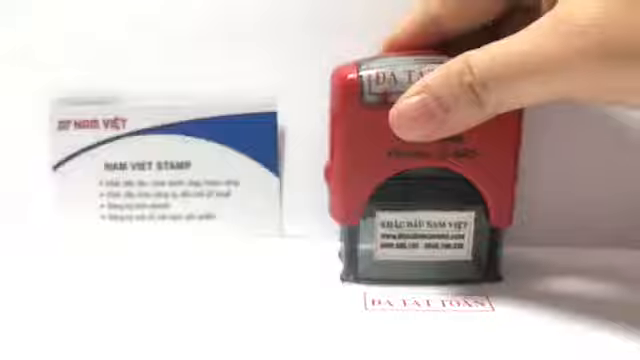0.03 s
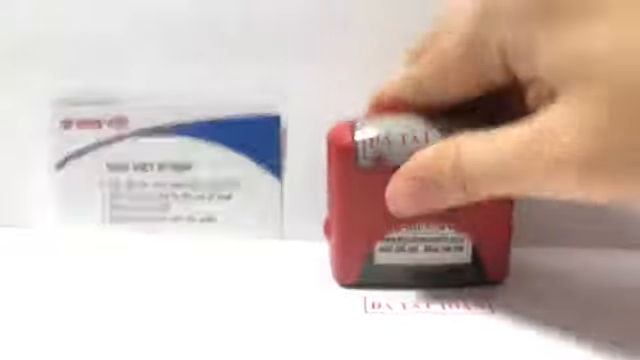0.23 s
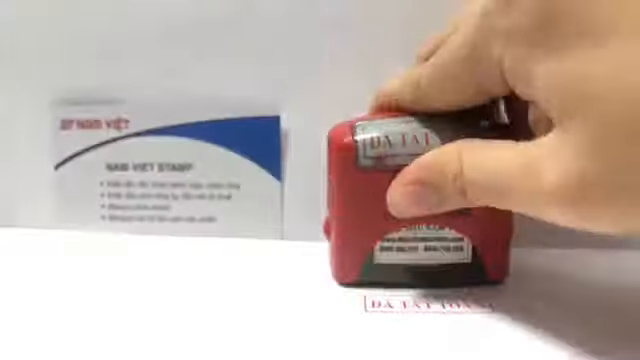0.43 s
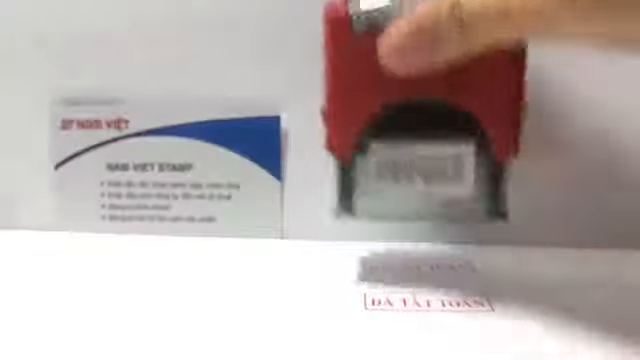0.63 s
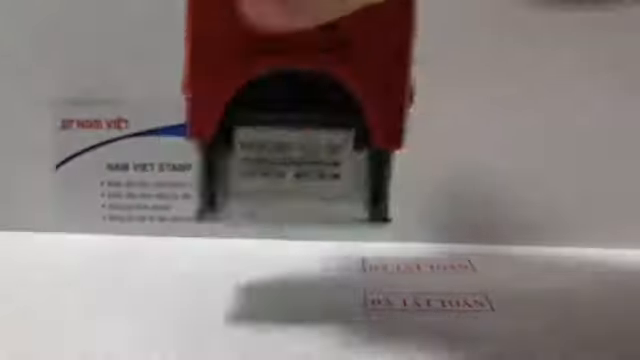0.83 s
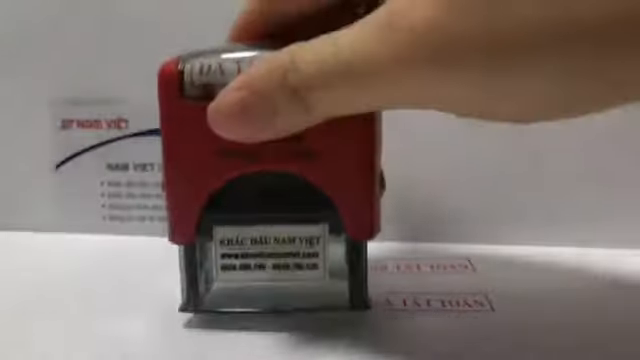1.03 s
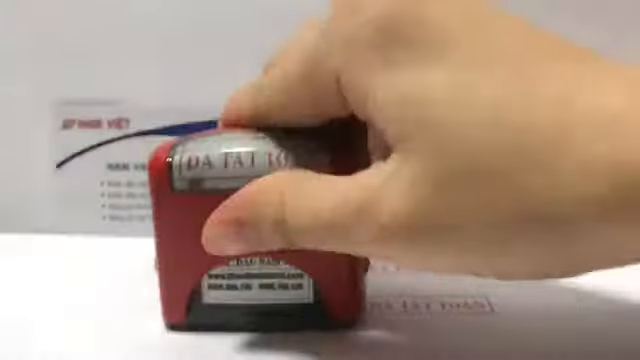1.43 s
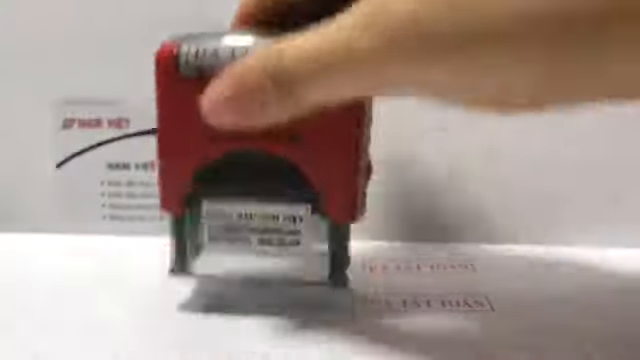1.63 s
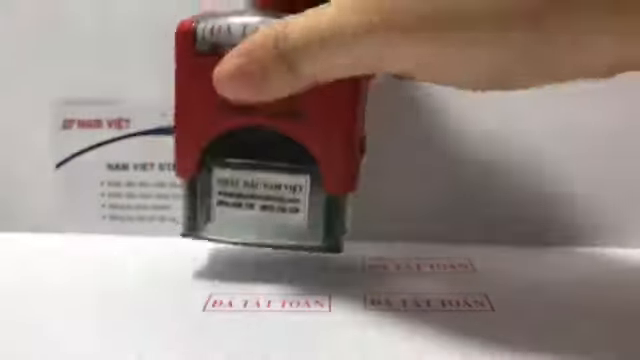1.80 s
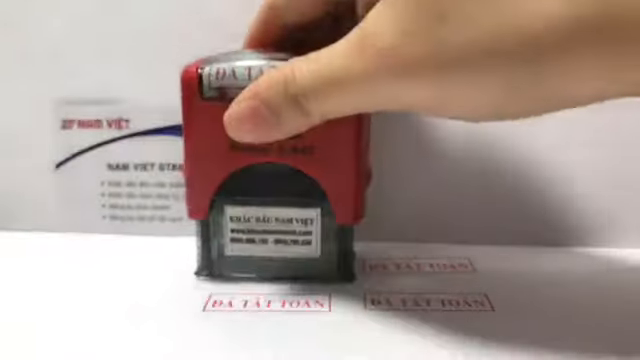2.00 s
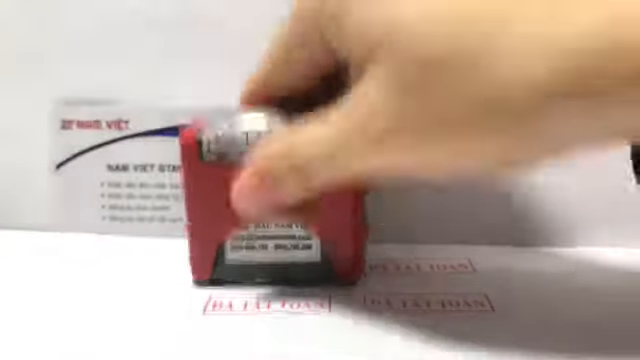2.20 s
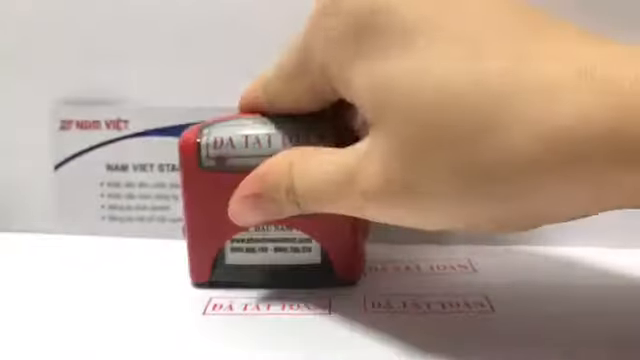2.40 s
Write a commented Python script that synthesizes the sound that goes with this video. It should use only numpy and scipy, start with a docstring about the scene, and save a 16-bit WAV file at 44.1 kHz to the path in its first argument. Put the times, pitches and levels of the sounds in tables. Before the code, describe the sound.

A plastic self-inking stamp is pressed onto paper three times, each a sharp clack with a low desk thump. It springs back with a click after the first two presses. Heard close in a small, quiet room.

```python
"""Self-inking stamp on a desk

A plastic stamp is pressed onto paper three times and springs back twice, close by. In each stroke
the case ticks and rubs along its frame, the die plate flips over and the slide clacks against its stop.
Presses thump the desk and leave the spring ringing. A small room answers; a limiter flattens the clacks."""
import sys
import numpy as np
from scipy import signal
from scipy.fft import rfft, irfft
from scipy.io import wavfile
from scipy.ndimage import uniform_filter1d, minimum_filter1d

SR = 44100
rng = np.random.default_rng(int(sys.argv[2]) if len(sys.argv) > 2 else 0)


def persist_wave(psi):
    """Save psi, clipped to +-1, as 16-bit WAV."""
    counts = np.round(np.clip(psi, -1, 1) * 32767).astype(np.int16)
    wavfile.write(sys.argv[1], SR, np.atleast_2d(counts).T)


N = 112454
T = np.arange(N) / SR


def amp(db):
    """Decibels to gain."""
    return 10 ** (np.asarray(db) / 20)


def add(out, start_s, x):
    """Mix x in from start_s."""
    i = int(start_s * SR)
    out[i:i + len(x)] += x[:N - i]


def noise(spectrum, size):
    """Noise of rms 1, shaped by (Hz, dB) points."""
    hz, db = np.array(spectrum).T
    bin_hz = np.maximum(np.fft.rfftfreq(size, 1 / SR), 1)
    gain = amp(np.interp(np.log(bin_hz), np.log(hz), db)) * np.minimum(bin_hz / hz[0], 1) ** 2
    x = irfft(gain * np.exp(2j * np.pi * rng.random(len(bin_hz))), size)
    return x / x.std()


def ring(modes, tuning, rise_cycles, tilt_db_oct=0):
    """Damped modes, tilted about 1 kHz. Each builds over its first cycles, so low ones speak late."""
    t = T[:N // 6]
    out = np.zeros(len(t))
    for k, (hz, db, t60_s) in enumerate(modes):
        decay = amp(db + tilt_db_oct * np.log2(hz / 1000) - 60 * t / t60_s)
        rise = 1 - np.exp(-(hz * t / rise_cycles) ** 2)
        out += (-1) ** k * decay * rise * np.sin(2 * np.pi * hz * tuning * t)
    return out


# Each row: frequency in Hz, rms level in dB.
HUM_TONES = [(100.5, -66.5), (149.5, -68)]
# Each row: frequency in Hz, relative density in dB.
AIR_SPECTRUM = [(40, -10.5), (60, -10.5), (115, -5), (200, -9), (320, -15.5), (600, -24), (1100, -26.5),
                (2200, -36), (4000, -38), (8000, -44.5), (16000, -47)]

def background():
    """Still room air and a faint mains hum."""
    hum = sum(amp(db) * np.sqrt(2) * np.sin(2 * np.pi * (hz * T + rng.random())) for hz, db in HUM_TONES)
    return amp(-61.5) * noise(AIR_SPECTRUM, N) + hum


# Each row: frequency in Hz, tail level in dB, T60 in seconds.
ROOM_BANDS = [(60, -13.5, 1), (160, -7.5, 0.39), (258, -1.5, 0.62), (500, -10, 0.39), (1000, -17.5, 0.45),
              (2520, -16, 0.43), (5000, -15.5, 0.38), (7600, -25, 0.6), (16000, -14, .28)]

def room(x, lag_s=0.008, rise_s=0.004, early_db=-11.5, early_fall_s=0.0078):
    """Early echoes off desk and wall, then a diffuse tail that lasts longest in the bass."""
    hz, db, t60_s = np.array(ROOM_BANDS).T
    t = T[:N // 3]
    log_hz = np.log(np.maximum(np.fft.rfftfreq(len(t), 1 / SR), 1))
    white = rfft(rng.standard_normal(len(t)))
    early = rng.standard_normal(len(t)) * np.exp(-t / early_fall_s)
    response = amp(early_db) * early * np.sqrt(2 / (early_fall_s * SR))
    for share, gain, rate in zip(np.eye(len(hz)), amp(db), np.log(1000) / t60_s):
        band = irfft(white * np.interp(log_hz, np.log(hz), share), len(t))
        response += gain * band * np.exp(-rate * t) * np.sqrt(2 * rate / SR)
    onset = np.clip((t - lag_s) / rise_s, 0, 1)
    return signal.fftconvolve(x, response * onset)[:N]


# Each row: frequency in Hz, relative density in dB.
SKID_SPECTRUM = [(400, 6), (1000, 0), (3000, 0.5), (6000, -12), (15000, -26.5)]

def skid():
    """The frame skids softly over the paper before the last press."""
    swell = np.interp(T, [1.993, 2.2, 2.23], [0, 1, 0])
    return amp(-63) * swell * noise(SKID_SPECTRUM, N)


# Each row: frequency before tuning in Hz, level in dB, T60 in seconds.
DESK_MODES = [(61.7, -5.5, .2), (98, -6.5, 0.24), (135, -1, 0.073), (168, -3, 0.16), (220.4, -13, 0.3),
              (274.6, -8, .15), (343, -8.5, 0.074), (505, 7, 0.016)]

def desk_thump(db, tuning):
    """The struck desk top rings low."""
    return amp(db) * ring(DESK_MODES, tuning, rise_cycles=0.78)


# Dense upper modes of the plastic. Each row: frequency in Hz, relative density in dB.
CHATTER_SPECTRUM = [(200, -15), (500, -9), (1000, 1), (1650, 1), (2050, -3.5), (2700, 2.5), (3900, -2),
                    (5200, -0.5), (8200, -3.5), (9600, -6), (10900, -14.5), (12500, -4), (15500, -14)]
# First instant of contact. Each row: frequency in Hz, relative density in dB.
SNAP_SPECTRUM = [(1000, -12), (3000, 4), (8000, 2), (11000, -8.5), (13000, -2.5), (15500, -2.5)]

def knock(modes, ring_db, crack_db, chatter_s, tuning, tilt_db_oct=0, rise_cycles=0.67):
    """Struck plastic: the case rings under a crack made of a bright snap and brief chatter."""
    rise_s, fall_s, snap_s, snap_db = 0.00024, 0.0018, 0.0007, -3.5
    out = amp(ring_db) * ring(modes, tuning, rise_cycles, tilt_db_oct)
    t = T[:1024]
    envelope = (1 - np.exp(-t / rise_s)) * np.exp(-np.maximum(t - chatter_s, 0) / fall_s)
    chatter = envelope * noise(CHATTER_SPECTRUM, len(t))
    snap = amp(snap_db) * t / snap_s * np.exp(1 - t / snap_s) * noise(SNAP_SPECTRUM, len(t))
    add(out, 0, amp(crack_db) * (chatter + snap))
    return out


# Case damped by the fingers. Each row: frequency before tuning in Hz, level in dB.
TICK_MODES = [(570, -13), (800, -13), (1080, -4.5), (1350, -1.5), (1650, 2), (2450, -7.5)]
# Each row: start in seconds, ring in dB, crack in dB, tuning ratio.
CASE_TICKS = [(0.07, -64, -55, 0.76), (.148, -45, -57.5, 0.72), (0.2, -32, -54, .95),
              (0.2078, -25, -45, 0.85), (0.221, -34.5, -47, 1.13), (0.403, -33, -50.5, 2.06),
              (0.588, -37, -41, 0.85), (1.279, -42.5, -57, 0.85), (1.2907, -31.5, -45, 1.04),
              (1.294, -37, -47.5, 1.5), (1.303, -36.5, -48, .9), (1.605, -29, -42.5, 1.06),
              (1.609, -33.5, -41, 1), (2.07, -70, -56.5, 1.1), (2.207, -36.5, -50.5, 0.77),
              (2.217, -34, -46, 0.95)]
# The frame touches down or rocks on the paper, or the case starts upward.
# Each row: start in seconds, ring in dB, crack in dB, desk thump in dB.
SOFT_BUMPS = [(.098, -44.5, -52.5, -47), (.192, -51, -64, -48.5), (.403, -42, -64, -39.5),
              (.593, -33.5, -47.5, -42.5), (1.248, -46.5, -56, -54.5), (1.253, -38, -56.5, -42),
              (1.599, -47.5, -61, -50), (2.202, -35.5, -61.5, -46.5)]

def handling(t60_s=0.014, chatter_s=0.0039, lowpass_hz=7000):
    """The loose case ticks under the fingers; soft bumps also sound the desk."""
    out = np.zeros(N)
    modes = [(hz, db, t60_s) for hz, db in TICK_MODES]
    for start_s, ring_db, crack_db, tuning in CASE_TICKS:
        add(out, start_s, knock(modes, ring_db, crack_db, chatter_s, tuning, rise_cycles=1.5))
    for start_s, ring_db, crack_db, thump_db in SOFT_BUMPS:
        add(out, start_s, knock(modes, ring_db, crack_db, chatter_s, tuning=1, rise_cycles=1.5))
        add(out, start_s, desk_thump(thump_db, tuning=0.9))
    return signal.sosfilt(signal.butter(1, lowpass_hz, fs=SR, output="sos"), out)


# Each row: frequency in Hz, relative density in dB.
RUB_SPECTRUM = [(150, -10.5), (600, -2.5), (1600, -2.5), (2200, -14), (6000, -27), (15000, -32)]

def rubbing(level_db=-31, grain_hz=409, grain_db=3.5):
    """The case creeps, then slides unevenly along the frame before each stop."""
    from_stop_s = [-0.056, -0.03, -0.015, 0, 0.0018]
    gains = [0, amp(-9), 1, 1, 0]
    sliding = sum(np.interp(T - stop_s, from_stop_s, gains) for stop_s, *_ in LANDINGS + RETURNS)
    grain = np.interp(T * grain_hz, np.arange(N), rng.standard_normal(N))
    return amp(level_db + grain_db * grain) * sliding * noise(RUB_SPECTRUM, N)


def spring(hz=737, rise_s=0.087, t60_s=1.5):
    """Each landing sets the squeezed spring singing."""
    out = np.zeros(N)
    envelope = amp(-60 * T / t60_s) * (1 - np.exp(-T / rise_s))
    tone = envelope * np.sin(2 * np.pi * hz * T)
    for start_s, *_, spring_db in LANDINGS:
        add(out, start_s, amp(spring_db) * tone)
    return out


# Case on the desk, and lifted. Each row: frequency before tuning in Hz, level in dB, T60 in seconds.
PRESSED_MODES = [(485, -20, 0.027), (593.6, -10.5, 0.062), (712, -16, 0.09), (924, -9, 0.034),
                 (1041, -5.5, 0.033), (1223, -8, 0.04), (1530, -8, 0.022), (1748, -5.5, 0.024),
                 (2419, -11, .03), (2626, -13.5, .03), (5310, -28.5, 0.019), (6120, -28.5, 0.017),
                 (7030, -24, .03)]
LIFTED_MODES = [(417, -25, 0.074), (605, -14.5, 0.068), (800, -20, .04), (1074.5, -7, .04),
                (1282, -8, 0.042), (1520, -8, 0.014), (1676, -1.5, 0.035), (2210, -17.5, .03),
                (2612, -9.5, 0.032), (4720, -27.5, .03), (7280, -20.5, .03), (8200, -26.5, 0.01)]
# Knocks as the case travels down and up: the die plate flipping over and the slide clicking along its frame.
# Each row: start in seconds, ring in dB, crack in dB, # chatter in seconds, tuning ratio, ring tilt in dB per
# octave.
DOWN_KNOCKS = [(0.2296, -9, -27, 0.004, 1.013, 1.5), (0.2457, -36, -45, 0.0021, 0.7, 2.5),
               (0.253, -14.5, -38, 0.0045, 1.0, -5.5), (1.309, -11, -28.5, 0.0033, 0.99, -3.5),
               (1.3214, -16, -29.5, 0.005, 1.02, 3.5), (2.2336, -11.5, -20, 0.0015, .98, -1.5),
               (2.244, -27.5, -35.5, .002, 1.2, 1.5), (2.2508, -56, -36, 0.003, 0.75, -9.5)]
UP_KNOCKS = [(0.608, -13.5, -21.5, 0.0007, .95, -7.5), (0.624, -28.5, -44, 0.0017, 0.97, 4.5),
             (1.6221, -12.5, -21.5, 0.00056, 0.9, -0.5), (1.6405, -32.5, -38.5, 0.0023, 0.9, 1.5)]
# The die hits the paper. Each row: the six knock columns, desk thump in dB, spring in dB.
LANDINGS = [(0.2591, -8, -15, .0058, 0.98, 0.5, -24, -56.5),
            (1.3315, -6, -14.5, 0.0047, 0.95, -2, -23, -52.5),
            (2.2583, -7, -14, 0.0047, 0.91, -1, -22, -50.5)]
# The case hits its top stop. Each row: the six knock columns, recoil in dB.
RETURNS = [(0.6318, -7.5, -11, .004, 0.96, 0.5, -44.5), (1.6489, -11.5, -17.5, 0.0034, 1.0, 5, -39)]

def stamp(desk_lag_s=0.0075):
    """Plate knocks and end-stop clacks. Landings thump the desk; returns give a faint low recoil."""
    out = np.zeros(N)
    for modes, hits in ((PRESSED_MODES, LANDINGS + DOWN_KNOCKS), (LIFTED_MODES, RETURNS + UP_KNOCKS)):
        for start_s, ring_db, crack_db, chatter_s, tuning, tilt_db_oct, *_ in hits:
            add(out, start_s, knock(modes, ring_db, crack_db, chatter_s, tuning, tilt_db_oct))
    for start_s, *_, thump_db, _ in LANDINGS:
        add(out, start_s + desk_lag_s, desk_thump(thump_db, tuning=0.95))
    for start_s, *_, recoil_db in RETURNS:
        add(out, start_s + desk_lag_s, desk_thump(recoil_db, tuning=0.95))
    return out


def scene():
    """The stamp on its desk in the room, in mono."""
    near = stamp() + handling() + skid() + rubbing() + spring()
    return (near + room(near) + background())[None]


def record(dry, limit_db=-3, window_s=0.0009, lowpass_hz=16400):
    """A fast limiter holds down the clacks; a steep low-pass cuts the top."""
    window = int(window_s * SR)
    gain = np.minimum(1, amp(limit_db) / (np.abs(dry) + 1e-9))
    limited = dry * uniform_filter1d(minimum_filter1d(gain, window), window)
    return signal.sosfilt(signal.ellip(8, 0.2, 80, lowpass_hz, fs=SR, output="sos"), limited)


dry = scene()
out = record(dry)
persist_wave(out)
```